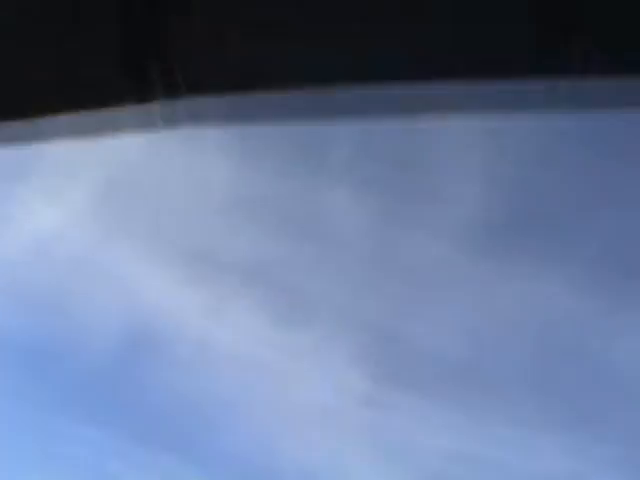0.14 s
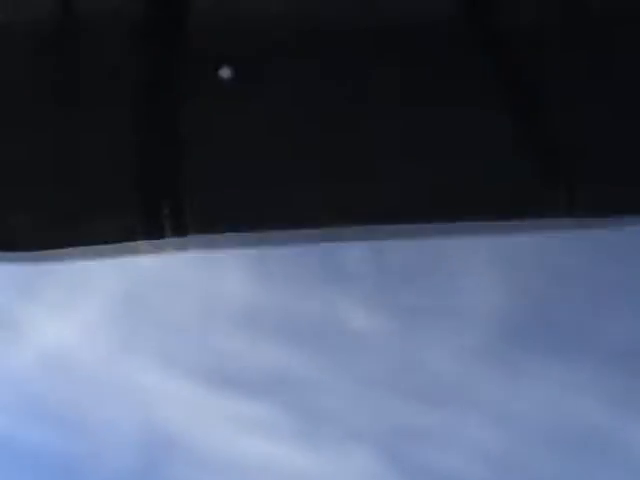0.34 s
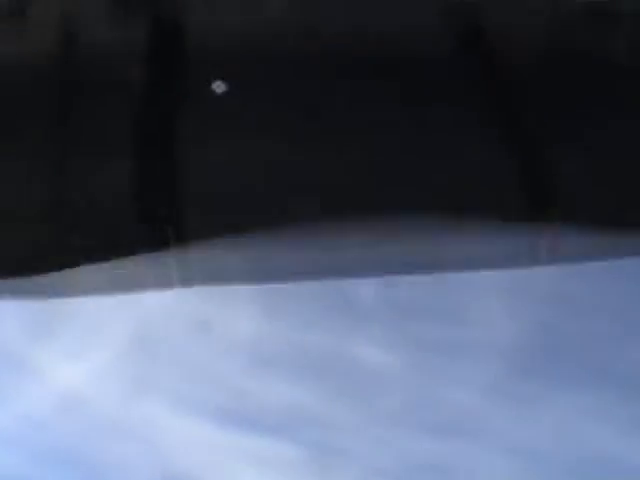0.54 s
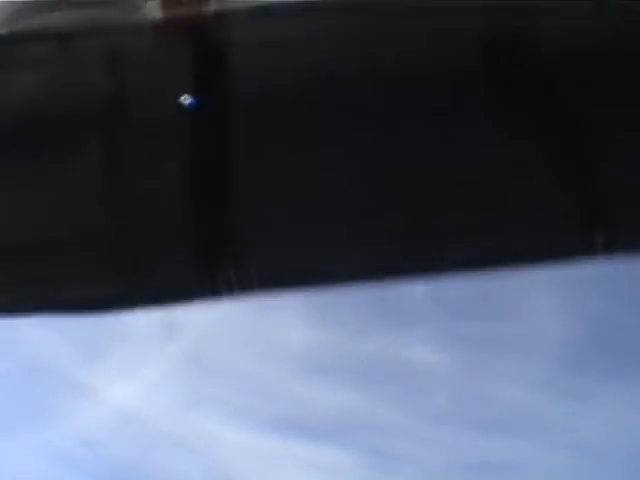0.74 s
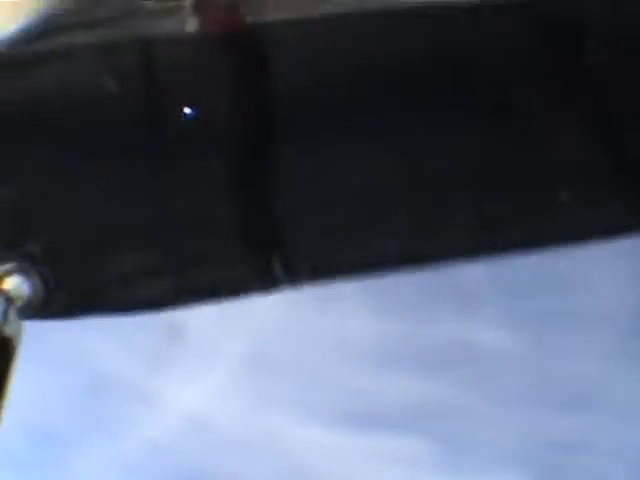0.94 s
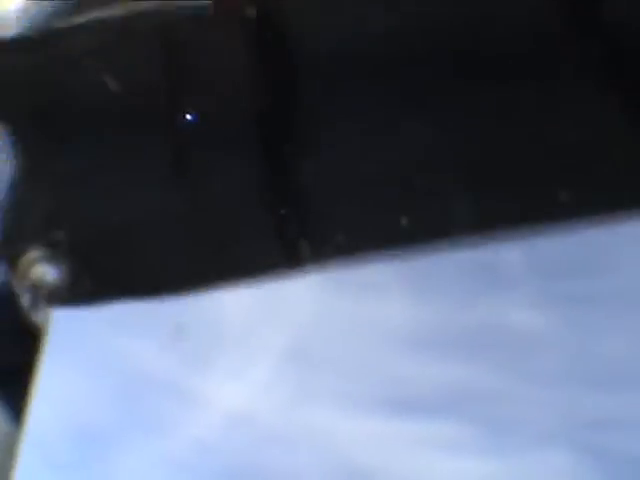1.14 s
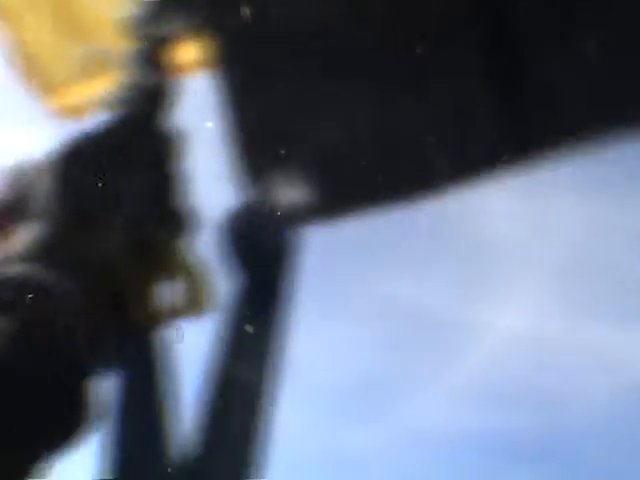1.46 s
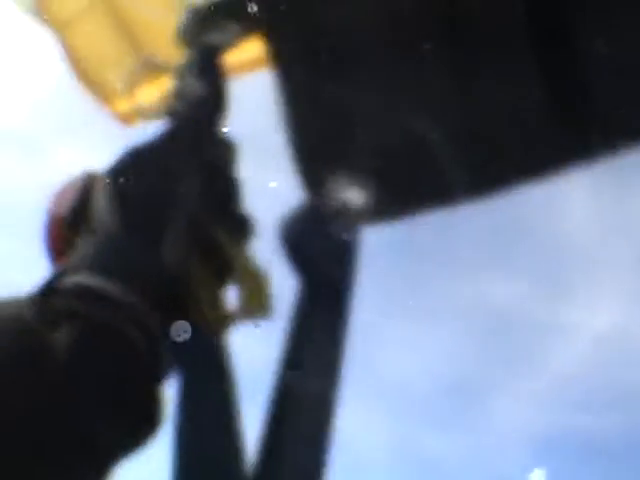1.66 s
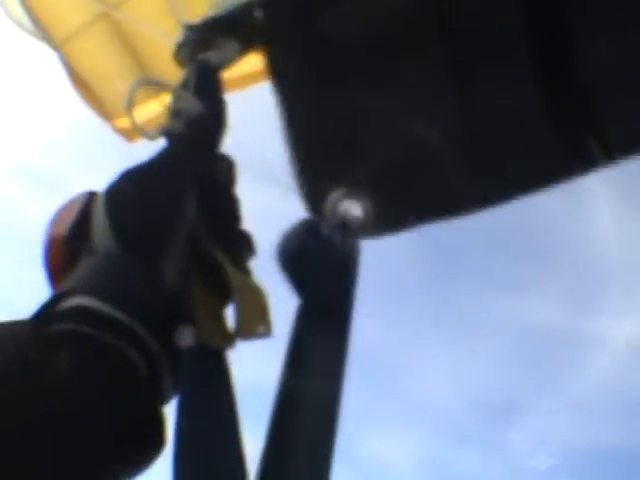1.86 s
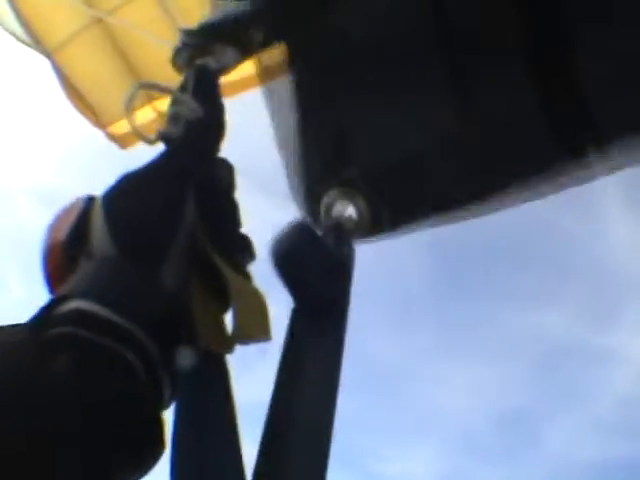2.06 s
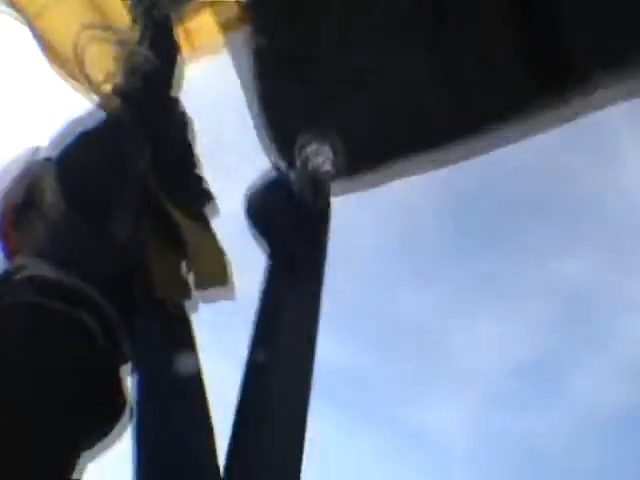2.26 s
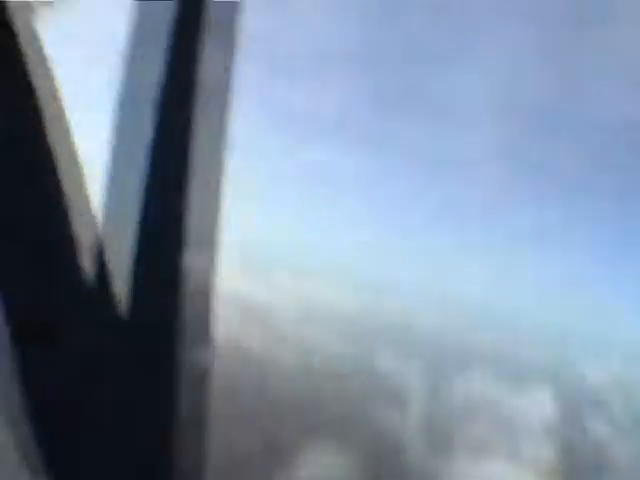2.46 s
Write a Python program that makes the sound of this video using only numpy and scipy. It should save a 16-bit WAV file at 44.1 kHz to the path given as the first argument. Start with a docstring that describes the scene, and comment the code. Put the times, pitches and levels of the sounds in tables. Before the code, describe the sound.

Loud wind roars throughout, bass-heavy and fluttering, with softer hiss, directly on a small camera's stereo microphone in open sky. Light dry crackle and ticks run through it. Knocks cluster from 0.7 to 0.85 seconds, with the hardest crack near 0.78. The wind eases around 1.5, a knock lands at 1.65, a deep thump of air hits near 1.77, and the roar swells again around 2.4.

```python
"""Air rushes past a small stereo camera hanging under a parachute: a roar and hiss on its two microphone ports.
Noise, partly common to the ports, is cut into half-octave bands that swell and flutter.
Cloth and straps knock and snap against the casing: impulses and noise bursts in resonances, mostly
near 2.3 kHz, among random small ones. The electronics whine faintly as sines; a limiter holds the peaks."""
import sys
import numpy as np
from scipy import signal
from scipy.fft import rfft, irfft, next_fast_len
from scipy.io import wavfile
from scipy.ndimage import uniform_filter1d, minimum_filter1d

SR = 44100
rng = np.random.default_rng(int(sys.argv[2]) if len(sys.argv) > 2 else 0)


def to_linear_factor(level_db):
    """Convert decibel levels (scalar or array-like) to linear amplitude factors."""
    exponent = np.asarray(level_db, float) / 20
    return 10 ** exponent


def dump(signal):
    """Clip the signal to [-1, 1] and save it as 16-bit WAV at the path in sys.argv[1]."""
    limited = np.clip(np.atleast_2d(signal).T, -1, 1)
    pcm = np.round(limited * 32767).astype(np.int16)
    wavfile.write(sys.argv[1], SR, pcm)


N = 114660
SIZE = next_fast_len(N + 4096)
HZ = np.arange(SIZE // 2 + 1) * SR / SIZE + 1   # offset keeps the logarithm finite

# Upper bands of the air rush, used about their means.
# Each row: time in seconds, low middle in dB, middle in dB, treble in dB.
RUSH_LEVELS = [(0, -27.5, -32, -37), (.06, -26, -31, -41.5), (.12, -24, -28, -36), (.17, -23.5, -33.5, -40),
               (.3, -21.5, -33.5, -44.5), (.4, -24.5, -36.5, -42), (.52, -26.5, -35, -43),
               (.66, -24.5, -33.5, -43.5), (.78, -25.5, -35.5, -40.5), (.9, -26, -37.5, -45),
               (1.1, -27, -34.5, -46.5), (1.3, -28.5, -38.5, -47.5), (1.5, -31, -38, -48.5),
               (1.62, -33, -34, -46), (1.74, -25, -33, -39.5), (1.85, -31, -36.5, -44.5),
               (2.1, -26, -32, -40), (2.3, -23, -30.5, -39.5), (2.46, -24, -30, -40),
               (2.52, -28.5, -37.5, -43.5), (2.6, -24.5, -32.5, -40)]


def rms_one(x):
    """Scale to unit rms."""
    return x / np.sqrt(np.mean(x ** 2) + 1e-20)


def in_time(rows):
    """Columns of a table as straight lines in time, about their mean."""
    s, *columns = np.transpose(rows)
    lines = [np.interp(np.arange(N) / SR, s, c) for c in columns]
    return [line - line.mean() for line in lines]


def at_hz(rows, hz):
    """Columns of a table read on a log-frequency axis."""
    f, *columns = np.transpose(rows)
    return [np.interp(np.log(hz), np.log(f), c) for c in columns]


def drift(corner_hz):
    """Two-pole low-passed noise of spread 1, drawn at SR / 8."""
    r = np.exp(-16 * np.pi * corner_hz / SR)
    settle = 4000
    noise = rng.standard_normal(N // 8 + 2 + settle)
    slow = signal.lfilter([1], [1, -2 * r, r * r], noise)[settle:]
    return np.interp(np.arange(N) / 8, np.arange(len(slow)), rms_one(slow - slow.mean()))


def ports():
    """Response of the left and right port, and the power share of turbulence common to both."""
    # Each row: frequency in Hz, left minus right in dB, power share heard by one port alone in dB,
    # lead of the left in radians.
    port_rows = [(30, -.15, -26, 0), (150, -.1, -29, -.02), (500, -.25, -28, -.07), (950, .1, -20, -.12),
                 (1600, .3, -14, -.1), (2300, .2, -20, .02), (3400, 4, -6, .34), (4200, 4.6, -4.5, .25),
                 (5000, 3.2, -5, 1.04), (6600, 8.2, -6, 2.6), (7500, 9.6, -2.7, 3.6), (8500, 9, -1.4, 5.3),
                 (9500, 5.3, -1.8, 5.9), (11000, 1.6, -3.3, 6.3), (13000, 1.2, -1.4, 6.8),
                 (15500, 1.4, -2, 6.4)]
    balance_db, alone_db, lead_rad = at_hz(port_rows, HZ)
    side = np.array([[.5], [-.5]])
    gain = to_linear_factor(side * balance_db) / np.sqrt(np.cosh(balance_db * np.log(10) / 20))   # mean power 1
    alike = 1 - to_linear_factor(2 * np.minimum(alone_db, 0))
    return gain * np.exp(1j * side * lead_rad), alike


def air():
    """Turbulence: coloured noise, partly common to both ports, in overlapping bands that swell and flutter."""
    # Buffeting, used about its means. Each row: time in seconds, rumble in dB, roar in dB.
    roar_levels = [(0, -18.5, -13.5), (.13, -14.5, -16), (.32, -12, -12), (.36, -16, -16.5),
                   (.52, -13.5, -15), (.59, -17.5, -16), (.61, -15, -13.5), (.84, -16, -16.5),
                   (.95, -17, -16.5), (1.37, -16.5, -18.5), (1.49, -26.5, -25.5), (1.59, -18, -17),
                   (1.61, -23.5, -20.5), (1.74, -19, -14.5), (1.77, -6, -14.5), (1.8, -27, -19),
                   (1.88, -21.5, -20), (1.92, -16.5, -18), (2.2, -18, -14), (2.37, -14.5, -8.5),
                   (2.49, -19.5, -20), (2.6, -14.5, -16.5)]
    # Colour of the noise. Each row: frequency in Hz, relative density in dB per Hz.
    air_colour = [(25, -22), (40, -22), (65, -7), (100, -4.5), (150, 0.2), (220, -0.5), (480, -1.4),
                  (600, -3.5), (720, -12), (950, -15.5), (1300, -17), (1600, -26), (2500, -24.5),
                  (3000, -30), (4200, -36.5), (5000, -37), (6600, -35), (8500, -45), (9500, -48),
                  (11000, -53), (14000, -62), (15500, -65)]
    # Unsteadiness. Each row: frequency in Hz, shared flutter in dB, own flicker of each band in dB.
    # Opposite signs of shared flutter move opposite ways.
    unsteady = [(60, -1.64, 1.2), (500, 1.7, -0.85), (2000, 1.3, 1.0), (6000, 1.27, .5), (14000, 2, 1.7)]
    level_hz = [50, 202, 520, 1260, 2430, 5070]   # deep, rumble, roar, low middle, middle, treble
    deep_share = 0.21   # the deepest bass follows the rumble only partly
    flutter_hz, slow_flutter_hz, slow_share, flicker_hz = 160, 20, 0.081, 8
    lowest_hz, bands, rms_db = 30, 19, -11

    response, alike = ports()
    common, *own = rfft(rng.standard_normal((3, SIZE)))
    colour_db, = at_hz(air_colour, HZ)
    turbulence = np.sqrt(alike) * common + np.sqrt(1 - alike) * np.array(own)
    both = to_linear_factor(colour_db) * response * turbulence

    roar_db = in_time(roar_levels)
    levels_db = np.array([deep_share * roar_db[0]] + roar_db + in_time(RUSH_LEVELS))
    flutter = drift(flutter_hz) + slow_share * drift(slow_flutter_hz)
    place = np.clip(2 * np.log2(HZ / lowest_hz), 0, bands - 1)
    out = 0
    for k in range(bands):
        hz = lowest_hz * 2 ** (k / 2)
        shares = [np.interp(np.log(hz), np.log(level_hz), pick) for pick in np.eye(6)]
        shared_db, own_db = at_hz(unsteady, hz)
        gain = to_linear_factor(shares @ levels_db + shared_db * flutter + own_db * drift(flicker_hz))
        band = np.clip(1 - abs(place - k), 0, 1)
        out = out + gain * irfft(both * band, SIZE)[:, :N]
    return to_linear_factor(rms_db) * rms_one(out)


def clicks(times_s, levels_db):
    """Single impulses at the given moments."""
    out = np.zeros(N)
    places = np.minimum((np.asarray(times_s) * SR).astype(int), N - 1)
    np.add.at(out, places, to_linear_factor(levels_db))
    return out + 1e-18


def bursts(times_s, levels_db, length_s):
    """Random-sign noise under t exp(-t / length_s) envelopes that peak at the given levels."""
    r = np.exp(-1 / (length_s * SR))
    envelope = signal.lfilter([(1 - r) * np.e], [1, -2 * r, r * r], clicks(times_s, levels_db))
    return envelope * rng.choice([-1, 1], N)


def chance(per_s, base_db, spread_db):
    """Random moments and levels with an exponential tail, louder when the middle of the rush is strong."""
    count = int(per_s * N / SR)
    draw = rng.random((1000, 2))[:count]
    times_s = draw[:, 0] * N / SR
    rush_db = np.interp(times_s, np.arange(N) / SR, in_time(RUSH_LEVELS)[1])
    return times_s, base_db + rush_db - spread_db * np.log(draw[:, 1] + 0.011)


def resonance(x, hz, width_hz):
    """Band-pass resonance, scaled so that the power of white noise hardly depends on the width."""
    sos = signal.butter(2, [hz - width_hz / 2, hz + width_hz / 2], "band", fs=SR, output="sos")
    return signal.sosfilt(sos, x) * np.sqrt(SR / 4 / width_hz)


def struck(times_s, peaks_db, hz, width_hz):
    """Impulses ringing in a resonance, each reaching its given peak."""
    unit_peak = abs(resonance(clicks([0], [0]), hz, width_hz)).max()
    return resonance(clicks(times_s, peaks_db), hz, width_hz) / unit_peak


def knocks():
    """Each listed knock rings the casing once, within a rough rustle; small random ones patter between."""
    # Dull knocks. Each row: start in seconds, peak of the ring in dB, ring in Hz.
    knock_rows = [(0.09, -15, 2140), (0.4953, -18.5, 1780), (0.705, -17, 2380), (0.7214, -13, 1830),
                  (0.7617, -18, 2400), (0.784, -6, 2200), (0.8388, -14, 2380), (1.426, -19, 2140),
                  (1.522, -19.5, 2360), (1.6483, -10, 2190), (1.7119, -17, 2180), (1.7284, -16, 2350),
                  (1.876, -18.5, 2480), (2.07, -21.5, 2560), (2.449, -17, 2430)]
    casing_hz, width_hz, rustle_s, rustle_loss_db = 2330, 950, .0016, 7
    s, peak_db, _ = np.transpose(knock_rows)
    patter = bursts(*chance(per_s=80, base_db=-52.5, spread_db=5.5), rustle_s)
    rustle = bursts(s, peak_db - rustle_loss_db, rustle_s)
    rough = resonance(patter + rustle, casing_hz, width_hz)
    rings = sum(struck([start], [db], hz, width_hz) for start, db, hz in knock_rows)
    return rough - rings


def snaps():
    """Straps snap: single broad pulses, each with a rough treble tick, among random small crackle."""
    # Sharp snaps. Each row: start in seconds, body peak in dB, treble burst level before its band in dB.
    snap_rows = [(.1989, -34, -36), (.2803, -22, -40), (.9896, -30, -42), (1.1155, -25, -39),
                 (1.186, -27, -43), (1.2097, -19, -33), (1.4252, -28, -43), (1.697, -30, -42),
                 (1.7515, -28, -33), (.7774, -4.5, -31)]
    body_hz, body_width_hz = 2900, 3500
    tick_hz, tick_width_hz, tick_s = 9800, 5200, 0.0005
    s, body_db, tick_db = np.transpose(snap_rows)
    crackle = struck(*chance(per_s=100, base_db=-53, spread_db=4), body_hz, body_width_hz)
    body = struck(s, body_db, body_hz, body_width_hz) + crackle
    ticks = resonance(bursts(s, tick_db, tick_s), tick_hz, tick_width_hz)
    return ticks - body


def whine():
    """Camera electronics: steady sines of random phase, equal on both sides."""
    # Each row: frequency in Hz, level in dB rms.
    tones = [(13049, -85), (13200, -80), (15149, -87), (15299, -88), (15601, -88)]
    t = np.arange(N) / SR
    return sum(np.sqrt(2) * to_linear_factor(db) * np.sin(2 * np.pi * (hz * t + rng.random())) for hz, db in tones)


def scene():
    """Air plus the contacts heard through the ports, and the whine."""
    response, _ = ports()
    contacts = irfft(response * rfft(knocks() + snaps(), SIZE), SIZE)[:, :N]
    return air() + contacts + whine()


def roll_off(x):
    """The treble ends steeply here."""
    return signal.sosfilt(signal.butter(12, 15700, fs=SR, output="sos"), x)


def record(dry):
    """A fast look-ahead limiter: the larger port sets one gain for both, which recovers at a steady dB rate."""
    limit_db, smooth_s, release_db_per_s = -2.5, 0.0049, 291
    over_db = np.maximum(20 * np.log10(abs(dry).max(0) + 1e-9) - limit_db, 0)
    ramp_db = release_db_per_s * np.arange(N) / SR
    held_db = np.maximum.accumulate(over_db + ramp_db) - ramp_db
    span = int(smooth_s * SR) | 1
    cut_db = minimum_filter1d(-held_db, span)
    for _ in range(2):
        cut_db = uniform_filter1d(cut_db, span // 2)
    return roll_off(dry * to_linear_factor(cut_db))


dry = scene()
out = record(dry)
dump(out)
```